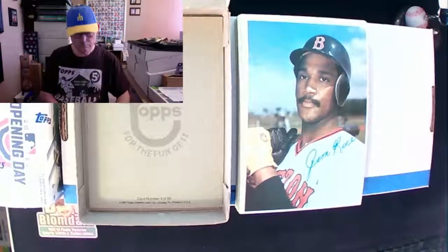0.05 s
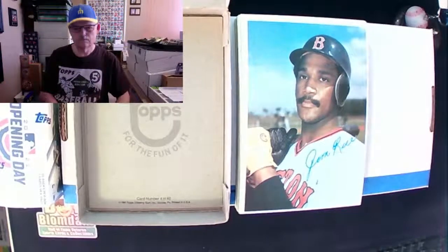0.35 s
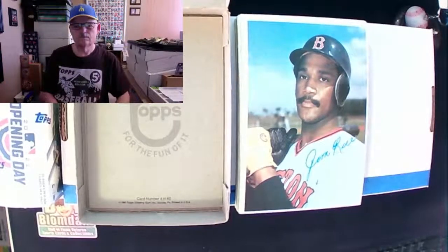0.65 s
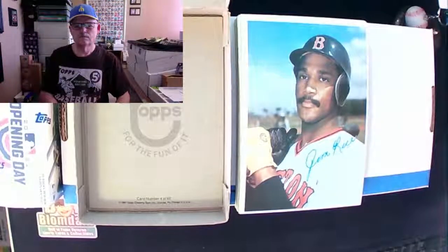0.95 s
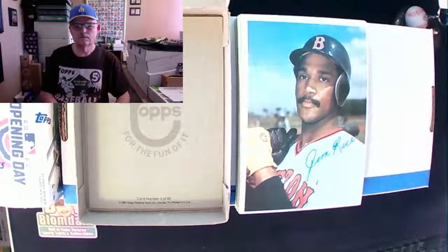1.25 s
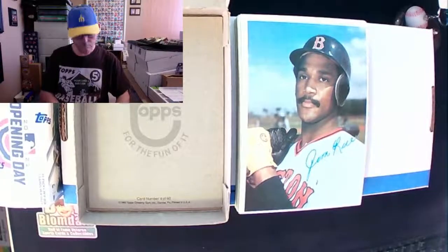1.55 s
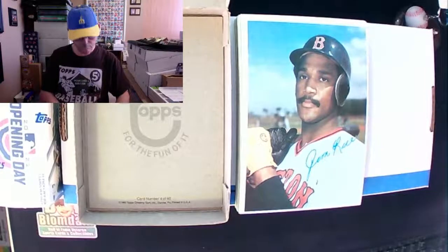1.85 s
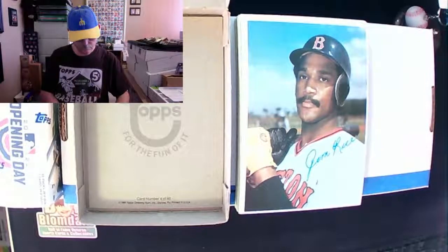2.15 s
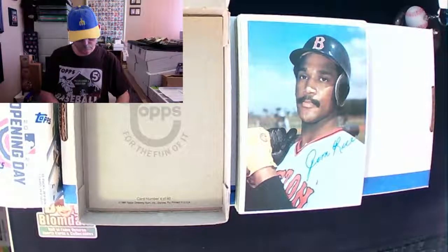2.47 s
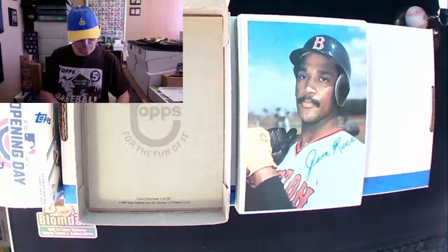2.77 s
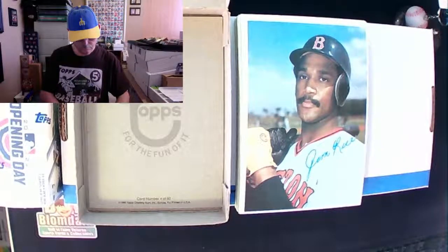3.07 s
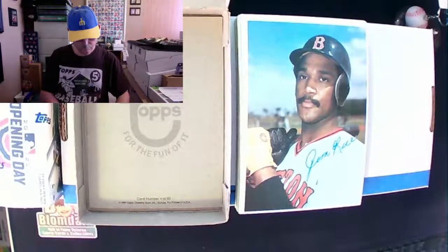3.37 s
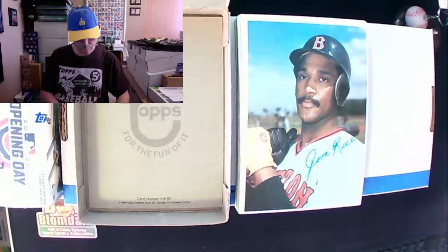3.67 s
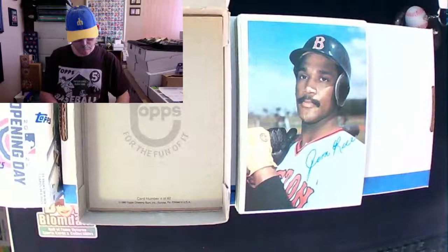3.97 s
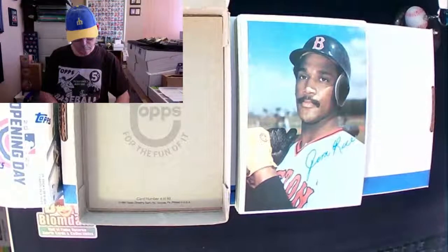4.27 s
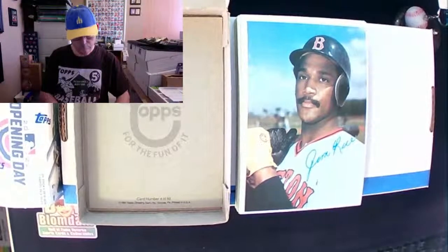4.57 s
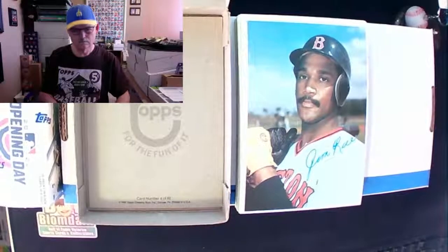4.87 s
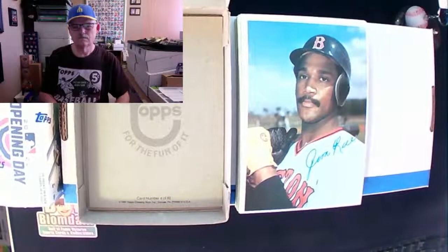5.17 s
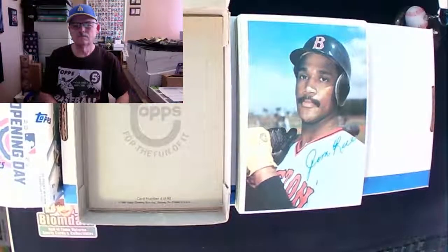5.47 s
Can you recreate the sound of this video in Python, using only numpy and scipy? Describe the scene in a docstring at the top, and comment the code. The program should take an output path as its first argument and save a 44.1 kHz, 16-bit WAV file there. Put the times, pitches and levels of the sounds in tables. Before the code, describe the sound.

Slow, uneven typing on a plastic computer keyboard in a small room, with a steady fan and hiss behind it. It begins with faint ticks of fingers touching the keys. Four separate keystrokes follow, then a short pause and seven mostly louder ones, each clacking and thudding softly through the desk. A few very faint high chirps come and go, and the microphone hiss lifts a little with each stroke.

```python
"""Typing in a small quiet room. A fan whirs throughout, over the microphone's hiss.
First fingers touch the keycaps with light ticks, and faint high chirps pass.
From about 2 s eleven keys are pressed, one at a time: each impact excites the plastic case (a clack),
then the low modes of the desk (a thud), and the key springs back with a tick. A last chirp follows.
A noise suppressor opens at each stroke, so the hiss swells and then sinks again."""
import sys
import numpy as np
from scipy import signal
from scipy.fft import rfft, irfft
from scipy.io import wavfile
from scipy.ndimage import uniform_filter1d

SR = 44100
rng = np.random.default_rng(int(sys.argv[2]) if len(sys.argv) > 2 else 0)


def persist_wave(psi):
    """Save psi, clipped to +-1, as 16-bit WAV."""
    counts = np.round(np.clip(psi, -1, 1) * 32767).astype(np.int16)
    wavfile.write(sys.argv[1], SR, np.atleast_2d(counts).T)


N = 247842
USUAL_DB = -27.5  # an ordinary stroke; force is the level above it


def amp(db):
    """Amplitude ratio of a level in decibels."""
    return 10 ** (np.asarray(db) / 20)


def unit_rms(x):
    """Normalisation to unit mean power."""
    return x / np.sqrt(np.mean(x ** 2) + 1e-20)


def curve(points, hz):
    """Linear interpolation on a logarithmic frequency axis."""
    f, value = np.transpose(points)
    return np.interp(np.log(hz + 1), np.log(f + 1), value)


def resonance(hz, centre_hz, width_hz):
    """Lorentzian shape of one resonance, 1 at its centre."""
    return 1 / (1 + (2 * (hz - centre_hz) / width_hz) ** 2)


def add(mix, s, sound):
    """Superposition: a sound joins the mix at time s."""
    part = mix[round(s * SR):][:len(sound)]
    part += sound[:len(part)]


def impact_axes(size=16384):
    """Time and frequency axes of one impact."""
    return np.arange(size) / SR, np.fft.rfftfreq(size, 1 / SR)


def decay(t, start_s, fall_s):
    """Exponential decay after a sudden onset."""
    return (t >= start_s) * np.exp(-np.maximum(t - start_s, 0) / fall_s)


def coloured(x, colour_db):
    """Source and filter: a burst is whitened, then rings through a minimum-phase filter."""
    spectrum = rfft(x)
    spectrum /= np.sqrt(uniform_filter1d(abs(spectrum) ** 2, size=90) + 1e-12)
    log_gain = np.log(amp(colour_db))
    log_response = np.conj(signal.hilbert(np.r_[log_gain, log_gain[-2:0:-1]]))[:len(spectrum)]
    y = irfft(spectrum * np.exp(log_response))[:len(x) // 2]
    return y / np.sqrt(np.sum(y ** 2) / (.02 * SR))  # energy of 20 ms at unit power


def fan(level_db=-55):
    """Broadband air noise and microphone hiss; the fan's narrow resonances make the whir."""
    # noise spectrum: f/Hz, relative density/dB
    floor = [(25, -24), (60, -16), (130, 5.5), (190, -5), (260, 1.5), (380, -4.5), (600, -3.5),
             (950, -15.5), (2000, -12), (3800, -19), (5200, -19), (6100, -23), (8500, -18), (15500, -22.5)]
    # fan resonances: f/Hz, width/Hz, gain/dB
    whir = [(1459, 22, 7), (2302, 244, 12), (2588, 74, 10), (3330, 130, 4)]
    hz = np.fft.rfftfreq(N, 1 / SR)
    colour_db = curve(floor, hz) + sum(db * resonance(hz, f, width) for f, width, db in whir)
    noise = rfft(rng.standard_normal(N))
    return amp(level_db) * unit_rms(irfft(noise * amp(colour_db), N))


def rattle(power, grain_db=-1.5):
    """Tiny uneven contacts sum to grainy noise under a power envelope."""
    noise, size = rng.standard_normal((2, len(power)))
    return np.sqrt(power) * unit_rms(noise * amp(grain_db * size))


def room_tail(t, start_s, linger=lambda hz: 1, build_s=0.0068):
    """Reverberation: dense reflections build up and decay, the treble first; linger scales T60."""
    # reverberation time of the room: f/Hz, T60/s
    room = [(300, 0.24), (800, 0.13), (2000, 0.15), (5500, 0.15), (10000, 0.14), (15000, 0.11)]
    hz, frame_s, noise = signal.stft(rng.standard_normal(len(t)), SR, nperseg=256)
    t60 = curve(room, hz) * linger(hz)
    tail = signal.istft(noise * amp(-60 * frame_s / t60[:, None]), SR)[1][:len(t)]
    return tail * (1 - decay(t, start_s, build_s)) * (t >= start_s)


def ripple(hz, size=110):
    """Modal overlap: a keycap's many high modes give random rounded peaks and deeper dips."""
    shape = unit_rms(uniform_filter1d(uniform_filter1d(rng.standard_normal(len(hz)), size), size))
    return np.minimum(shape, np.tanh(shape)) * hz ** 2 / (hz ** 2 + 2600 ** 2)


def tick(s, db, rings, rise_s=0.0031):
    """Light contact excites the keycap alone: a thin scratch, with resonances at rings (f/Hz, gain/dB)."""
    # spectrum of a light tick: f/Hz, gain/dB
    colour = [(200, 1), (3500, -29), (5000, -8), (7000, 1), (10000, 4), (13000, 0), (16000, 1)]
    t, hz = impact_axes()
    power = decay(t, 0, 0.0037) + 0.66 * decay(t, 0.0044, 0.0014)
    scratch = rattle(power) * (1 - decay(t, 0, rise_s))
    burst = scratch + amp(-10.5) * room_tail(t, 0)
    rings_db = sum(gain_db * resonance(hz, f, 790) for f, gain_db in rings)
    return s - .001, amp(db) * coloured(burst, curve(colour, hz) + rings_db + 3 * ripple(hz))


def chirp(s, length_s, start_hz, end_hz, db, fuzz_hz=120):
    """Modulation: low-passed noise on a gliding carrier is heard as a fuzzy whistle."""
    t = np.arange(0, length_s, 1 / SR)
    cycles = np.cumsum(np.linspace(start_hz, end_hz, len(t))) / SR
    noise = rng.standard_normal((len(t), 2)) @ [1, 1j]
    fuzz = signal.lfilter(*signal.butter(2, fuzz_hz, fs=SR), noise)
    whistle = (fuzz * np.exp(2j * np.pi * cycles)).real
    return s, amp(db) * unit_rms(whistle * np.sin(np.pi * t / length_s))


def contact(power, echo=0.86):
    """Comb filtering: a rattling contact interferes with its reflection off the desk top."""
    direct = rattle(power, grain_db=4.0)
    return direct + rng.choice([-echo, echo]) * np.roll(direct, rng.integers(25, 65))


def clack(s, db, hollow_db, clack_hz, node_hz, bright_db, cap_hz, ring_db, lead_s=.004, bottom_s=.007):
    """Impact excitation: a key is brushed, snaps down and bottoms out; case, keycap and room ring."""
    # broad response of the keyboard: f/Hz, gain/dB
    case = [(100, -29.5), (400, -26.5), (560, -12), (980, -10.5), (1480, -8), (2100, -5), (2480, -10.5),
            (3000, -9), (4000, -16.5), (4600, -11.5), (7000, -14.5), (8200, -11), (13000, -10),
            (16000, -17.5)]
    # modes of the plastic case: f/Hz, width/Hz, gain/dB
    shell = [(562.5, 24, 5.5), (1186, 40, 5), (1477, 142, 7), (1805, 14, 4.5), (1870, 46, -0.5),
             (1910, 44, -2.5), (2040, 150, 5.5), (2370, 62, 6.5), (2462, 63, 7.5)]
    # further keycap resonances: f/cap_hz, gain/dB, extra gain per unit of dullness/(dB/dB)
    keycap = [(.8, 0.5, 0), (1.38, 9, 0.9), (2.75, 1, 0.64)]
    t, hz = impact_axes()
    approach = np.exp(np.minimum(t - lead_s, 0) / .001) * (t < lead_s)
    brush = np.diff(rattle(approach), prepend=0)
    snap = contact(decay(t, lead_s, 0.0012)) + 0.8 * contact(decay(t, lead_s + 0.003, 0.0019))
    snap = signal.lfilter([.85], [1, -.33], snap)  # the fingertip dulls the first contact
    bottom = contact(decay(t, lead_s + bottom_s, 0.0021))
    # the case and the keycap's main mode outlast the rest, the longer the harder the stroke
    stretch = 1.27 * (0.92 + .018 * (db - USUAL_DB)) - 1
    tail = room_tail(t, lead_s, lambda f: 1 + stretch * (resonance(f, 1600, 450)
                                                         + resonance(f, cap_hz, 810)))
    # single echoes stand out of the tail
    flutter_db = 0.81 * unit_rms(uniform_filter1d(rng.standard_normal(len(t)), size=70))
    burst = amp(-11) * brush + snap + amp(-1.5) * bottom + amp(0.5 + flutter_db) * tail
    case_db = curve(case, hz) + sum(mode_db * resonance(hz, f, width) for f, width, mode_db in shell)
    place_db = (hollow_db * resonance(hz, 560, 210) + 6.5 * resonance(hz, clack_hz, 720)
                - 11 * resonance(hz, node_hz, 440))  # a mode with a node under this key is barely driven
    # a dull stroke leaves the keycap's own ring standing out
    cap_modes = [(cap_hz, ring_db)]
    cap_modes += [(ratio * cap_hz, mode_db - slope * bright_db) for ratio, mode_db, slope in keycap]
    cap_db = sum(mode_db * resonance(hz, f, 0.13 * f) for f, mode_db in cap_modes)
    treble_db = bright_db * hz ** 4 / (hz ** 4 + 4200 ** 4) + 4.0 * ripple(hz)
    return s - lead_s, amp(db) * coloured(burst, case_db + place_db + cap_db + treble_db)


def thud(s, db, hollow_db, finger_db=-58.5, spread_s=0.015):
    """Modal response of the desk to a push: a harder stroke lands sooner, louder and deeper."""
    # modes of the desk: f/Hz, level/dB, T60/s
    desk = [(77, 3, 0.35), (122, -3, 0.18), (138.4, 3, 0.2), (215.6, 0.5, 0.26), (323, -11.5, 0.23)]
    t, _ = impact_axes()
    force_db = db - USUAL_DB
    delay_s = 0.028 - .0006 * force_db
    # a hollow case gives way, which weakens and deepens the thud
    push_db = -52 + 0.9 * force_db - .5 * hollow_db
    low_hz = 68.4 / 2 ** (force_db / 36 + hollow_db / 13)
    gain = np.hypot(amp(finger_db), amp(push_db))  # the finger's own weight always lands
    push = 0.98 * rattle(decay(t, 0, spread_s)) / np.sqrt(spread_s * SR)
    push[0] -= 1  # the initial impulse
    ring = sum(amp(mode_db - 60 * t / t60) * np.cos(2 * np.pi * hz * t) for hz, mode_db, t60 in desk)
    band = signal.butter(4, [low_hz, 380], "bandpass", fs=SR, output="sos")  # soft push, small board
    y = signal.sosfilt(band, signal.fftconvolve(push, ring)[:len(t)])
    return s + delay_s, gain * y / np.sqrt(np.mean(y[t < .05] ** 2))


def scene():
    """Superposition of the fan, light touches, chirps and each key's clack, thud and release."""
    # fingers touching keys without pressing them: t/s, level/dB, ring f/Hz, ring gain/dB
    touches = [(.628, -51, 13900, 19), (.645, -53, 7300, 17), (.795, -54.5, 9000, 9),
               (0.984, -54.5, 6900, 22), (1.180, -57, 8950, 5), (1.205, -56.5, 6500, 12),
               (3.324, -40, 9350, 14), (3.33, -45.5, 7050, 22), (3.333, -40.5, 11100, 18)]
    # faint high chirps: t/s, duration/s, start f/Hz, end f/Hz, level/dB
    chirps = [(1.216, 0.053, 3060, 3150, -67), (1.484, 0.07, 3330, 3250, -61.5),
              (2.197, 0.085, 3280, 3150, -61), (5.59, 0.055, 4040, 4460, -54.5)]
    # key strokes: t/s, level/dB, hollowness of the case/dB, clack f/Hz, node f/Hz, brightness/dB,
    # keycap f/Hz, keycap ring/dB, time held/s, release level/dB
    strokes = [ (2.1094, -41.5, -6, 2420, 1110, -23, 5220, 13, .135, -64),
               (2.28, -28.5, 2, 1710, 890, -3, 4040, 7, 0.088, -56.5),
               (2.5490, -28.5, 2.5, 2520, 1030, -0.5, 4770, 6.5, 0.11, -60),
               (2.7975, -33.5, 10, 1530, 940, -6.5, 5250, 9.5, 0.084, -57.5),
               (3.4946, -26.5, 0.5, 1880, 1120, -7, 4790, 5.5, 0.1, -58),
               (3.6600, -19, -4, 2210, 3520, 1.5, 4700, -1.5, 0.066, -50),
               (3.9284, -23.5, -6, 2360, 3920, 6, 4720, 1, .084, -43.5),
               (4.1640, -21, 7, 1830, 3100, 1.5, 4970, 5.5, .091, -46),
               (4.426, -26, -2, 2420, 1040, -4, 5110, 8, 0.13, -57),
               (4.6130, -29.5, 7, 1460, 920, -13.5, 4870, 5, 0.11, -61.5),
               (4.8913, -25, -3, 2390, 930, -0.5, 5200, 11, 0.094, -57)]
    # resonances of a key springing back: f/cap_hz, gain/dB
    release = [(1.17, 15), (1.65, 12.5)]
    mix = fan()
    for s, db, hollow_db, clack_hz, node_hz, bright_db, cap_hz, ring_db, held_s, release_db in strokes:
        add(mix, *clack(s, db, hollow_db, clack_hz, node_hz, bright_db, cap_hz, ring_db))
        add(mix, *thud(s, db, hollow_db))
        rings = [(ratio * cap_hz, mode_db) for ratio, mode_db in release]
        add(mix, *tick(s + held_s, release_db, rings))
    for s, db, ring_hz, ring_db in touches:
        add(mix, *tick(s, db, [(ring_hz, ring_db)]))
    for row in chirps:
        add(mix, *chirp(*row))
    return mix[None]


def suppressor(x, shut_db=-51, open_db=-30, depth_db=6.5, close_s=0.6, open_at_start=0.69):
    """Downward expansion: loud sound raises the gain at once, then the gain sinks slowly back."""
    level_db = 10 * np.log10(abs(uniform_filter1d(x ** 2, size=256)) + 1e-12)
    opening = np.clip((level_db - shut_db) / (open_db - shut_db), 0, 1)
    sink = np.arange(N) / SR / close_s
    held = np.maximum(np.maximum.accumulate(opening + sink), open_at_start) - sink
    return x * amp(depth_db * (held - 1.5))


def record(dry):
    """Noise suppression, then band limiting by a steep low-pass filter."""
    lowpass = signal.firwin(401, cutoff=15950, window=("kaiser", 8), fs=SR)
    return signal.oaconvolve(suppressor(dry[0]), lowpass, "same")[None]


dry = scene()
out = record(dry)
persist_wave(out)
```